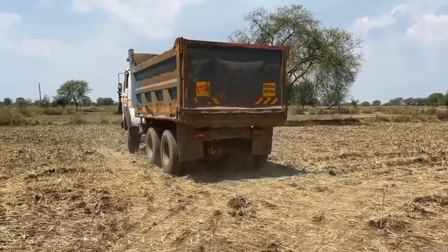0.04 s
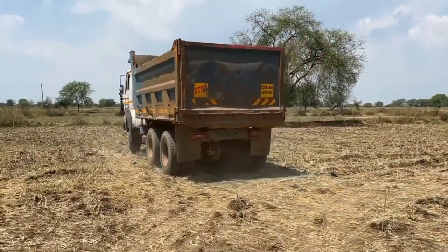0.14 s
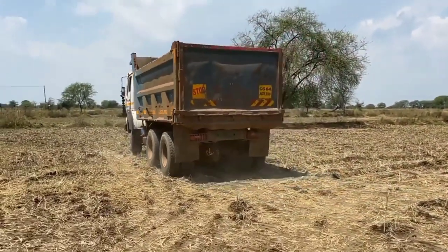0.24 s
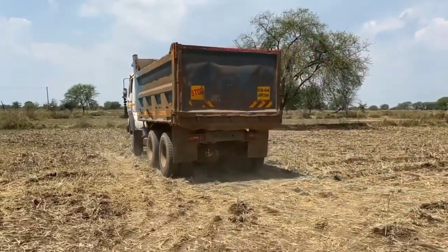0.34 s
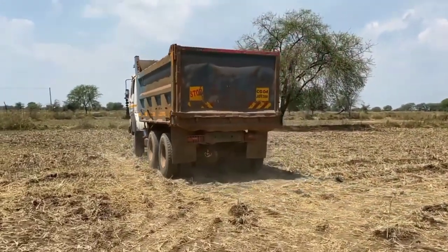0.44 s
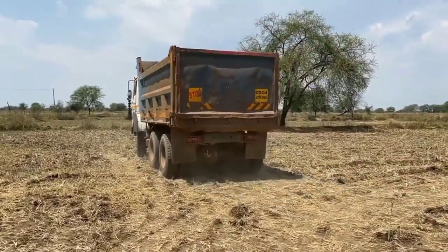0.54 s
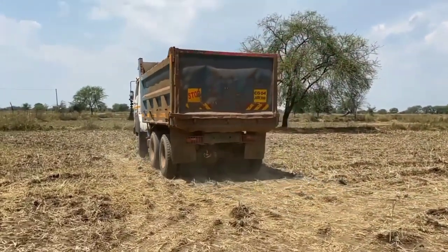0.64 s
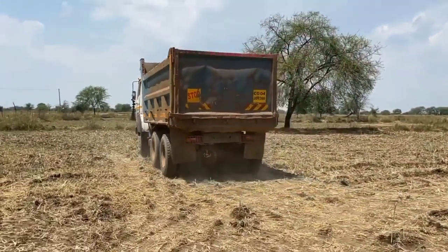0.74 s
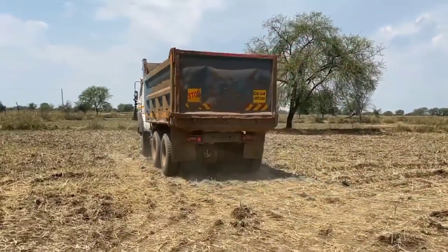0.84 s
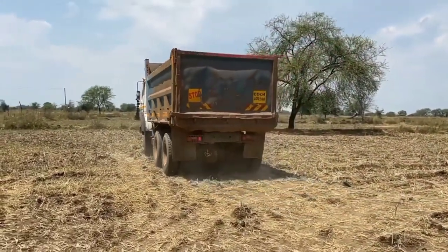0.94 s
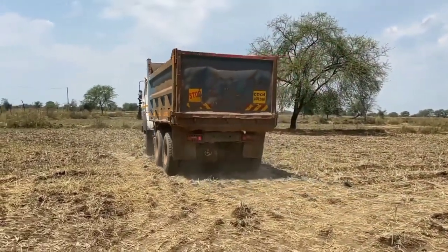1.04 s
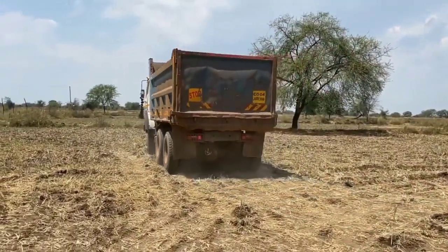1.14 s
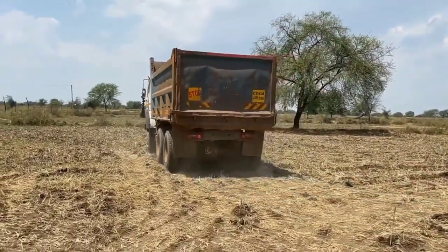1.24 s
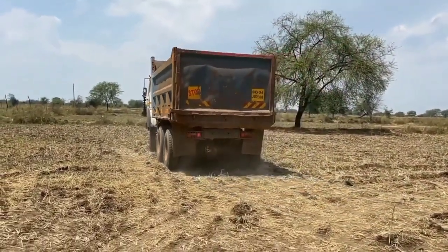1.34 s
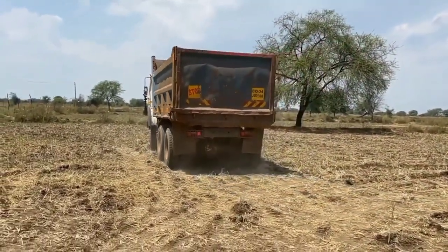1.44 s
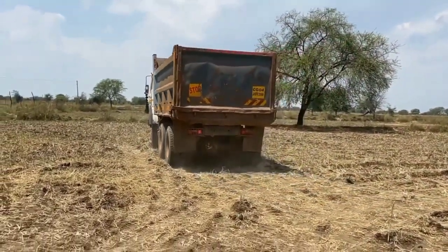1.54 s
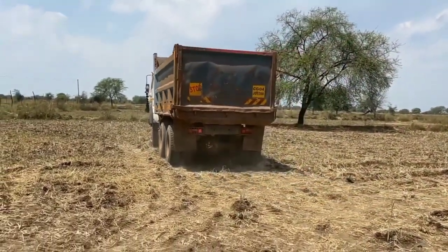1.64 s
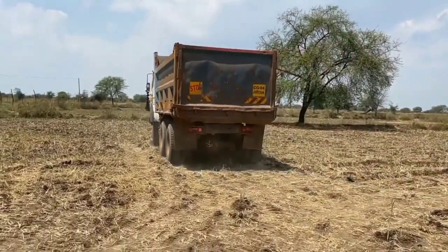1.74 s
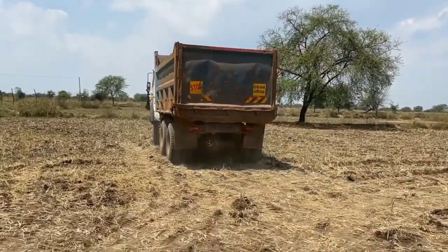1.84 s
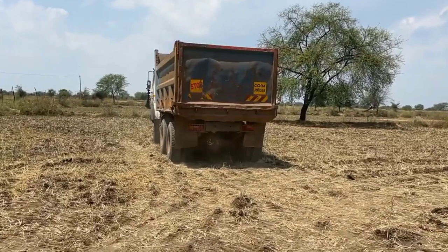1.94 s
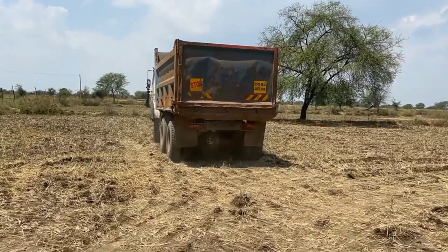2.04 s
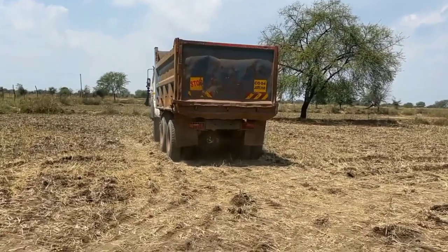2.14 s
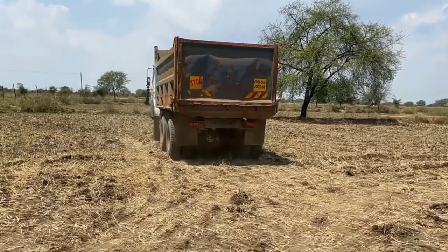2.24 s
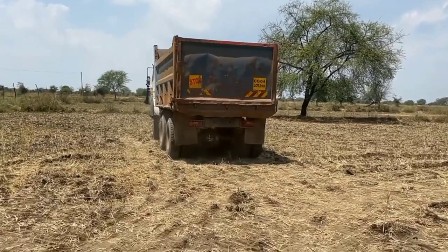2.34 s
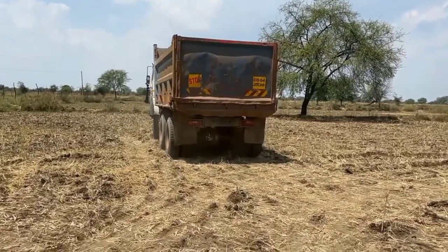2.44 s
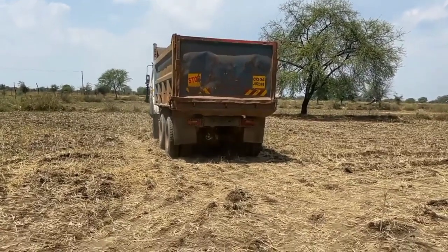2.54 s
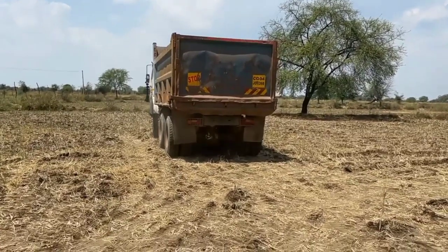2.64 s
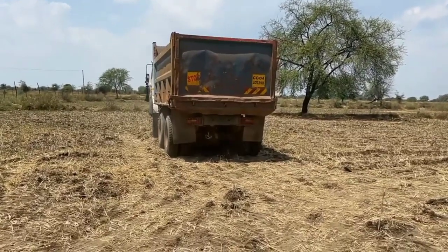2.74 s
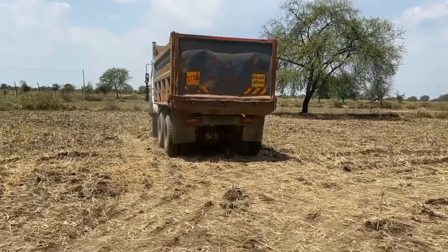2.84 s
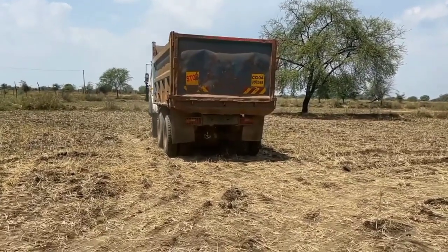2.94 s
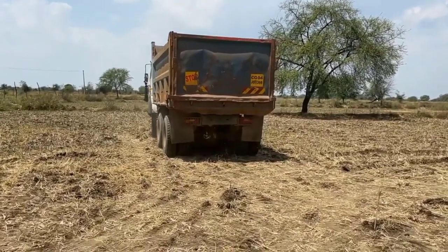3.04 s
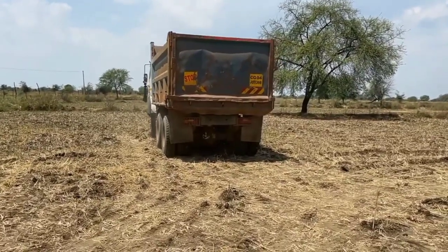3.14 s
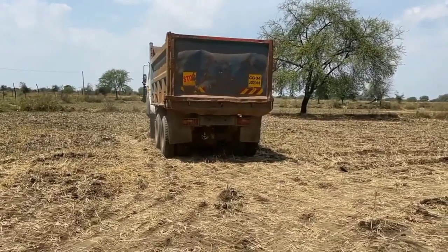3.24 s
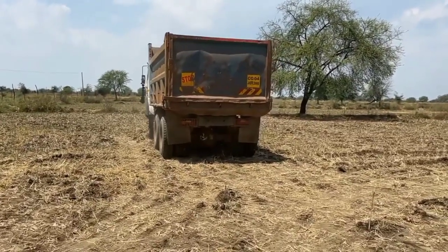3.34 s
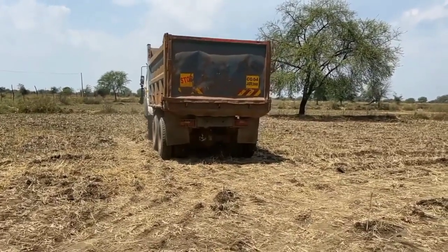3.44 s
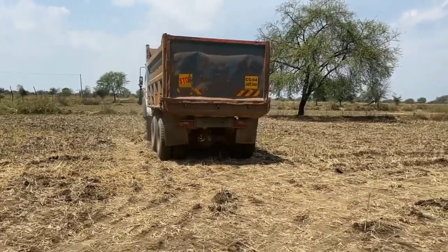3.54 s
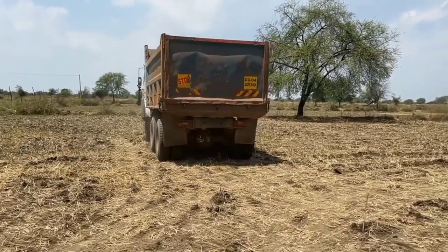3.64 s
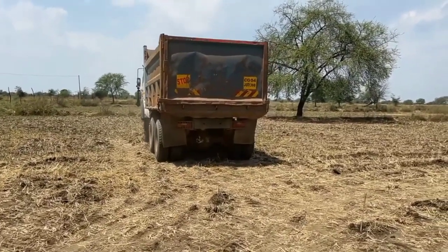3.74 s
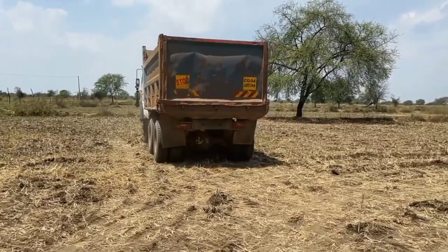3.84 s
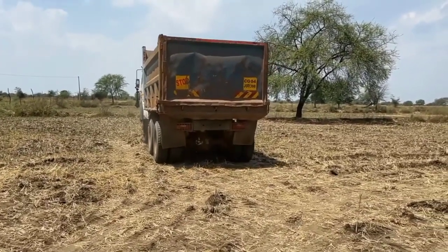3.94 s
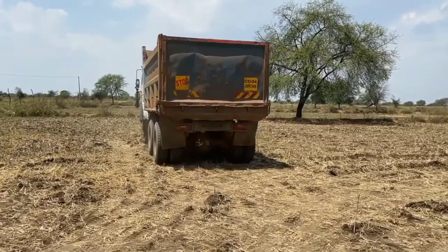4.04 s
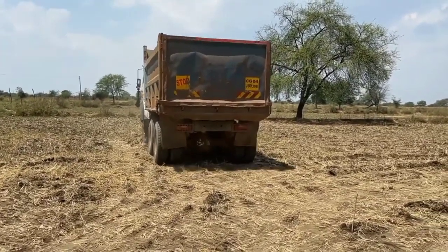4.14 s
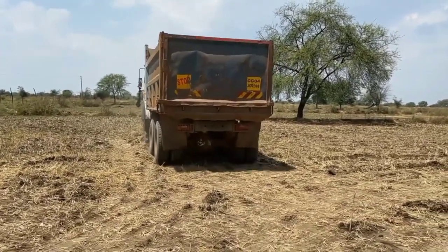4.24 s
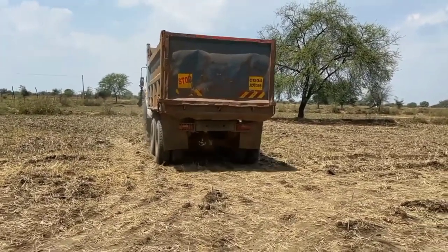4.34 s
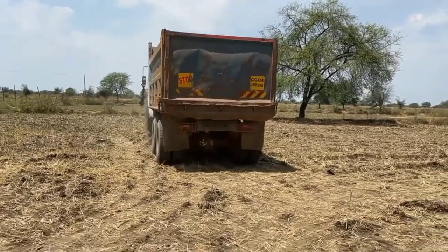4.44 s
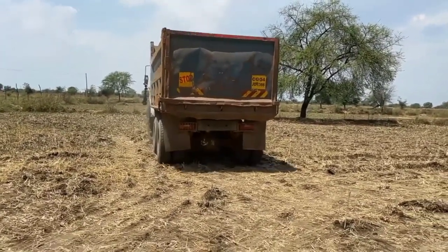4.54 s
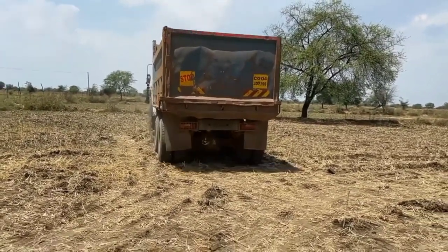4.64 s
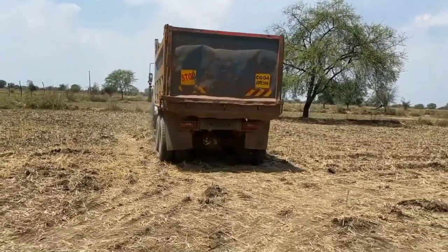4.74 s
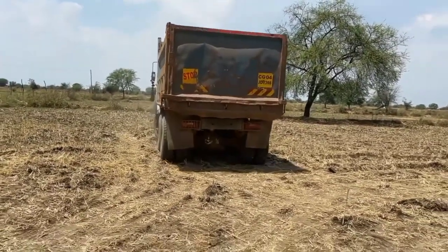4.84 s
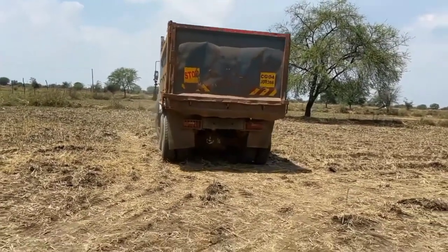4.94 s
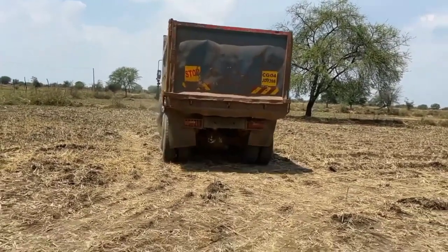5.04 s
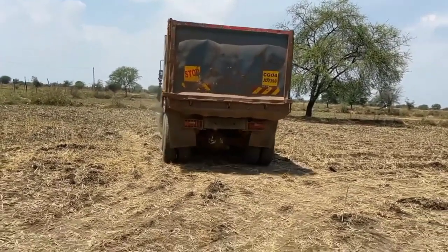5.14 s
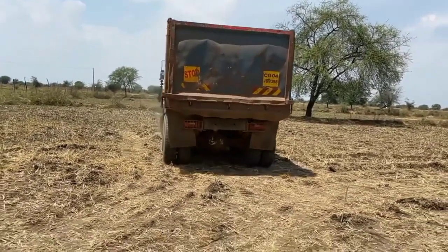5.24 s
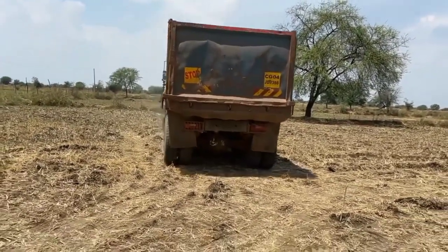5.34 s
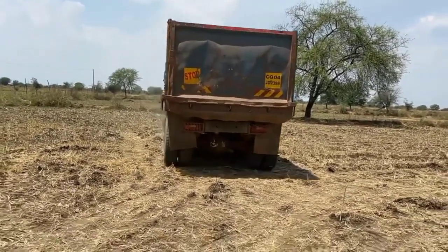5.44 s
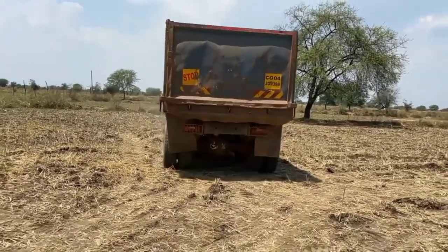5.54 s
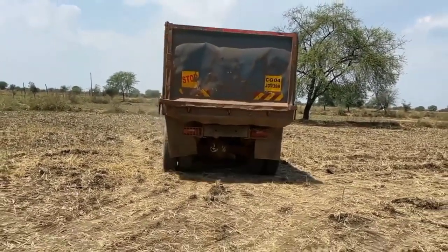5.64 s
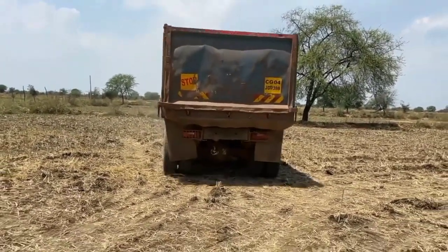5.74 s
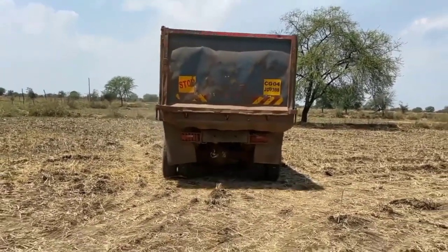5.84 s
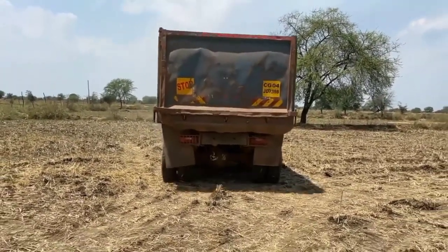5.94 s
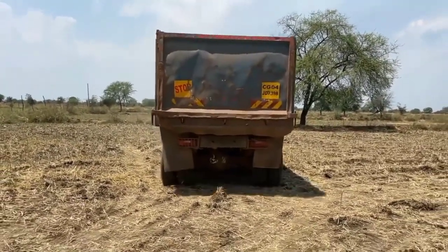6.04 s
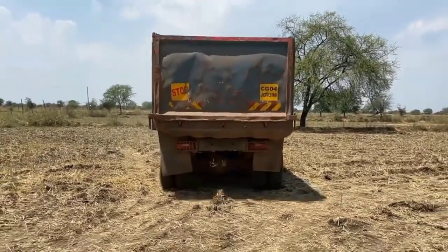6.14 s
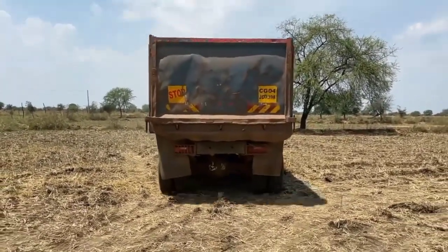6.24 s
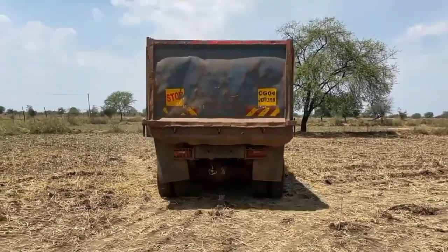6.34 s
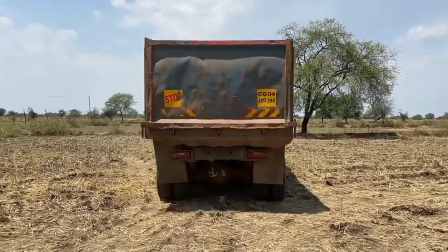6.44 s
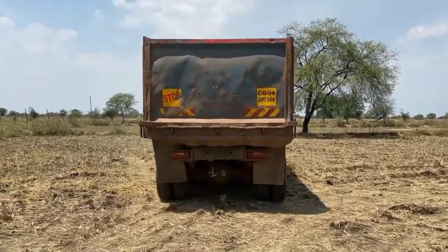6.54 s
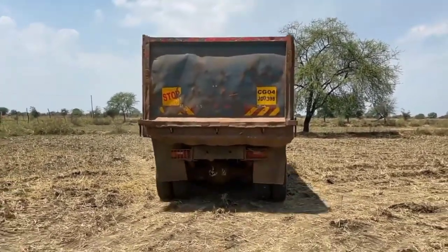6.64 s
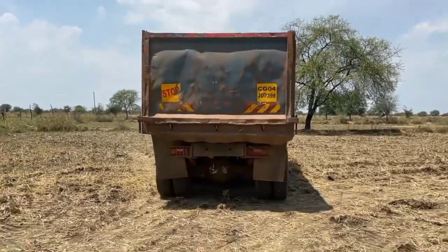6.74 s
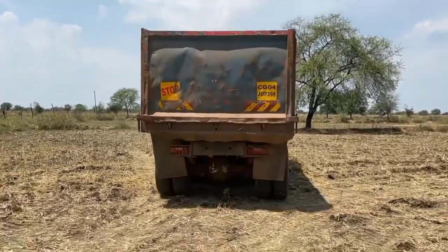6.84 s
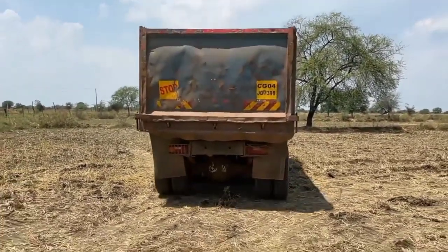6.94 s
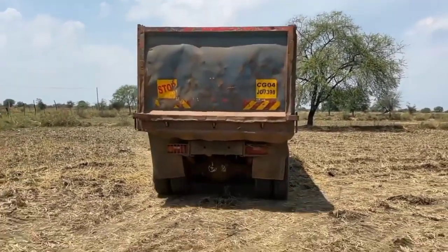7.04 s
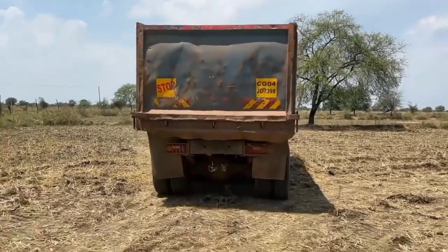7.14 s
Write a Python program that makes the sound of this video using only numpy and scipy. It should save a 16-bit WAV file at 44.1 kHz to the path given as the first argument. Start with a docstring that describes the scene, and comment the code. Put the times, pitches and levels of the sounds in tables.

```python
"""A loaded diesel tipper crawls over a dry stubble field: it eases off to idle, vents air, then pulls again.
Its exhaust booms as multiples of the firing rate sweep through pipe resonances, over coloured puffs of noise.
The steel body knocks (decaying bursts and tones) and squeaks (gliding harmonics); straw rustles and snaps.
A second diesel idles steadily out of sight: its pulsed noise ticks and its steady tones whine faintly."""
import sys
import numpy as np
from scipy import signal
from scipy.fft import rfft, irfft, next_fast_len
from scipy.io import wavfile

SR = 44100
rng = np.random.default_rng(int(sys.argv[2]) if len(sys.argv) > 2 else 0)


def unload_audio(sound):
    """Save the sound as a 16-bit wav file, at the path given as the first command line argument."""
    columns = np.transpose(np.atleast_2d(sound))
    # keep every value between -1 and 1, then stretch to whole-number steps
    steps = np.round(np.clip(columns, -1, 1) * 32767)
    wavfile.write(sys.argv[1], SR, steps.astype(np.int16))


N = 316638
T = np.arange(N) / SR


def amp(db):
    """Decibels express an amplitude ratio on a logarithmic scale."""
    return 10 ** (np.asarray(db) / 20)


def unit(x):
    """Dividing by the root mean square gives a signal unit effective amplitude."""
    return x / np.sqrt(np.mean(x ** 2) + 1e-20)


def curves(rows):
    """Linear interpolation joins each column of a table against time, its first column."""
    s, *columns = np.transpose(rows)
    return [np.interp(T, s, column) for column in columns]


def add(mix, start_s, sound):
    """Superposition: sounds that overlap simply sum."""
    part = mix[max(round(start_s * SR), 0):][:len(sound)]
    part += sound[:len(part)]


def colour(x, points):
    """Linear filtering multiplies a spectrum by a gain curve over log frequency; the result has rms 1."""
    hz, db = np.transpose(points)
    size = next_fast_len(N + 4096)
    log_hz = np.log(np.fft.rfftfreq(size, 1 / SR) + 1)
    gain = amp(np.interp(log_hz, np.log(hz), db, left=-70, right=-70))
    return unit(irfft(rfft(x, size) * gain, size)[:N])


def wander(hz):
    """Low-passed noise is a smooth random fluctuation, mostly slower than hz, with rms 1."""
    size, rate_hz = 8192, 1000
    f = np.fft.rfftfreq(size, 1 / rate_hz)
    slow = irfft(rfft(rng.standard_normal(size)) / np.sqrt(1 + (f / hz) ** 4))
    return unit(np.interp(T * rate_hz, np.arange(len(slow)), slow))


def burst(decay_s, hz, octaves, rise_s):
    """Impact: a band of noise round one pitch rises quickly and decays exponentially."""
    t = T[:SR // 2]
    f = np.fft.rfftfreq(len(t), 1 / SR) + 1
    band = np.exp(-0.5 * (np.log2(f / hz) / octaves) ** 2)
    noise = unit(irfft(rfft(rng.standard_normal(len(t))) * band, len(t)))
    return noise * (1 - np.exp(-t / rise_s)) * np.exp(-t / decay_s)


def fuzzy(hz, width_hz):
    """Narrow-band noise: random quadrature amplitudes spread a carrier, which may move, into a resonance."""
    phase = 2 * np.pi * np.cumsum(hz * np.ones(N)) / SR
    return wander(width_hz / 2) * np.cos(phase) + wander(width_hz / 2) * np.sin(phase)


def puffs(turns, length, bed, uneven_db):
    """Amplitude modulation: each firing sets off a decaying puff of its own strength over a steady noise bed."""
    # length is a share of the firing period; strengths run from -2 * uneven_db to 0 dB
    strength = amp(uneven_db * (2 * rng.random(1024) - 2.0))[turns.astype(int)]
    return (bed + strength * np.exp(-(turns % 1) / length)) * rng.standard_normal(N)


def truck():
    """Periodic combustion: one firing phase times the exhaust, rumble and block; straw rustles alongside."""
    # the truck's engine: start_s, firing_hz, effort_db
    engine = [(0, 62.56, -6), (.36, 57.8, -2), (.9, 58.78, -2.5), (1.05, 53.93, -2), (1.25, 51.12, -6),
              (1.62, 44.22, -0.5), (1.98, 37.79, -2.5), (2.4, 36.57, -1), (2.72, 34.42, -8.5),
              (3.1, 32.51, -3), (3.3, 31.2, -1), (3.5, 31.22, -4.5), (3.67, 35.41, 0.5),
              (3.95, 45.96, -0.5), (4.12, 49.9, -1.5), (4.58, 48.11, 0.5), (4.88, 52.96, -1.5),
              (5.06, 49.85, 2), (5.36, 56.04, -2.5), (5.55, 55.84, 0.5), (5.88, 59.18, 1), (6.65, 63.08, 1),
              (6.95, 60.6, 0), (7.18, 58.5, -6)]
    # level of rumble and clatter above what the speed gives: start_s, level_db
    noise_level = [(0, 1.7), (.85, 0.5), (1.4, -1), (2.5, -2.5), (3.2, 2), (3.62, 3.5), (4.0, -0.5),
                   (4.6, 1), (5.25, -0.6), (5.85, 0), (6.3, 0.5), (7.18, 1)]
    working_hz = 60  # firing rate at which the speed-dependent levels are stated
    firing_hz, effort_db = curves(engine)
    noise_db, = curves(noise_level)
    turns = np.cumsum(firing_hz) / SR  # firings so far
    octaves = np.log2(firing_hz / working_hz)
    return (exhaust(firing_hz, effort_db, turns) + barks(turns, octaves, effort_db)
            + rumble(turns, octaves, effort_db, noise_db) + clatter(turns, octaves, noise_db) + rustle())


def exhaust(firing_hz, effort_db, turns):
    """Source and filter: firing harmonics sweep through pipe resonances and dip as the fuel is eased."""
    # successive multiples of the firing rate: level_db, fuel_share (part that depends on the fuel)
    orders = [(-0.5, 1), (-7.5, 1), (-9.5, 0.34), (-12, 0.37), (-16, 0.33), (-13.5, 0.3)]
    # response of the exhaust pipe to a tone: frequency_hz, gain_db
    pipe = [(31, -55), (37, -48), (40, -33.5), (46, -24.5), (55, -20.5), (62, -18.5), (88, -22.5),
            (100, -36.5), (112, -44.5), (130, -27), (150, -26.5), (167, -26), (176, -34.5), (205, -40.5),
            (225, -42.5), (245, -35.5), (268, -37.5), (288, -32), (320, -44), (350, -41), (400, -52)]
    silencer_hz, silencer_width_hz = 151, 30  # tones above this resonance come out inverted
    pipe_hz, pipe_db = np.transpose(pipe)
    eased, out = easing(), np.zeros(N)
    for k, (db, fuel_share) in enumerate(orders, 1):
        tone_hz = k * firing_hz
        gain_db = np.interp(np.log(tone_hz), np.log(pipe_hz), pipe_db)
        level = amp(db + effort_db + gain_db) * (1 - fuel_share * eased)
        unsteady = 1 + np.sqrt(k) * (0.06 * wander(27) + 0.071 * wander(13.0))
        lag = np.pi / 2 + np.arctan(2 * (tone_hz - silencer_hz) / silencer_width_hz)
        out += level * unsteady * np.sqrt(2) * np.cos(2 * np.pi * k * turns - lag)
    return out


def easing():
    """Throttling: how far the fuel is eased at each moment, with linear ramps down and up."""
    # easings of the fuel: start_s, end_s, depth (above 1 the wheels drive the engine)
    easings = [(1.021, 1.897, 1.42), (2.034, 2.046, 0.93), (2.83, 2.958, 0.85), (3.192, 3.251, 0.75),
               (3.391, 3.434, 0.9), (3.646, 3.707, 1.14), (4.941, 5.126, 0.92)]
    ramp_s = 0.078  # each ramp is centred on the start or end time
    return sum(depth * np.clip(np.minimum(T - start, end - T) / ramp_s + 0.5, 0, 1)
               for start, end, depth in easings)


def barks(turns, octaves, effort_db):
    """Impulse response: each firing excites one sharp, quickly damped exhaust knock of its own strength."""
    level_db, growth_db_per_octave = -42, 27.5
    knock_hz, decay_s = 221, 0.0022
    fired = np.diff(np.floor(turns), prepend=0) > 0
    strength = np.minimum(rng.exponential(1, 1024), 3)[turns.astype(int)]
    t = T[:SR // 20]
    knock = np.sin(2 * np.pi * knock_hz * t) * np.exp(-t / decay_s)
    train = signal.oaconvolve(fired * strength, knock)[:N]
    band = signal.butter(3, [130, 400], "bandpass", fs=SR, output="sos")
    return amp(level_db + effort_db + growth_db_per_octave * octaves) * unit(signal.sosfilt(band, train))


def rumble(turns, octaves, effort_db, noise_db):
    """Subharmonics and pulsed flow: lines from unequal cylinders throb beside puffs of coloured gas noise."""
    # lines from unequal cylinders: multiple of the six-cylinder cycle, level_db (re the throb)
    cycle_lines = [(9, -8.5), (10, -6), (14, -8.5), (16, -5), (20, -12), (22, -15.5), (26, -14), (28, -15),
                   (32, -16)]
    # spectrum of the gas noise: frequency_hz, density_db (per Hz)
    gas_colour = [(25, -31), (45, -7), (75, 6), (110, 0.5), (170, -2.5), (210, -9), (270, -15),
                  (345, -14.5), (410, -22.5), (600, -28.5), (1200, -52)]
    throb_db, gas_db, growth_db_per_octave = -36, -32.5, 7.5
    eased_db = -2  # the gas rumbles less without fuel
    cycle = turns / 6  # one firing for each of six cylinders
    throb = np.zeros(N)
    for k, db in cycle_lines:
        turn = k * cycle + rng.random() + 0.11 * wander(5.2)
        throb += amp(db) * np.sqrt(2) * (1 + 0.34 * wander(8.2)) * np.cos(2 * np.pi * turn)
    gas = colour(puffs(turns, length=0.44, bed=0.38, uneven_db=11.0), gas_colour)
    level = amp(growth_db_per_octave * octaves + noise_db + eased_db * easing())
    return level * (amp(throb_db + effort_db) * throb + amp(gas_db) * gas)


def clatter(turns, octaves, noise_db):
    """Structure-borne sound: firings shake block and body, whose noise grows steeply with engine speed."""
    # spectrum of the block noise: frequency_hz, density_db (per Hz)
    block_colour = [(200, -23), (420, 4), (650, 8), (900, 1.5), (1150, -0.5), (1500, -6), (1900, -19),
                    (2500, -15), (3200, -13), (4600, -20.5), (5800, -28.5), (7000, -42), (9000, -64)]
    block_db, growth_db_per_octave = -45.5, 14
    block = colour(puffs(turns, length=0.35, bed=0.87, uneven_db=11.0), block_colour)
    return amp(block_db + growth_db_per_octave * octaves + noise_db) * (block + amp(-5.5) * rattle(rate_per_s=30))


def rattle(rate_per_s):
    """Random impulse trains excite damped resonances: loose fittings chatter in uneven taps, at rms 1."""
    # loose fittings of the tipper body: centre_hz, relative tap level_db
    fittings = [(420, -1), (700, -14), (1150, -2.5), (1800, -7), (2700, -9.5)]
    out = np.zeros(N)
    for hz, db in fittings:
        taps = (rng.random(N) < rate_per_s / SR) * rng.uniform(0.34, 1, N)
        tap = burst(decay_s=0.015, hz=hz, octaves=0.35, rise_s=0.00023)[:SR // 10]
        out += amp(db) * signal.oaconvolve(taps, tap)[:N]
    return unit(out)


def rustle():
    """Granular noise: random spikes over a fluctuating hiss are the straw crushed under the tyres."""
    # spectrum of the straw: frequency_hz, density_db (per Hz)
    straw_colour = [(2000, -17.5), (4500, 10), (7000, 6.5), (8600, -2.5), (10000, 3), (12000, -2),
                    (13500, -10), (14500, -25)]
    # level of the straw: start_s, level_db
    straw_level = [(0, -61.5), (0.9, -62.5), (1.5, -67), (2.4, -70.5), (3.0, -73), (3.95, -69.5),
                   (4.45, -63), (5.1, -69), (5.7, -61), (6.1, -63), (7.18, -62.5)]
    spikes = rng.random(N) < 250 / SR  # about 250 per second
    crunch = rng.standard_normal(N) * (1 + 6 * spikes) * amp(1.4 * wander(25))
    return amp(curves(straw_level)[0]) * colour(crunch, straw_colour)


def singing():
    """Structural resonance: narrow bands of noise swell and fade, drifting a little in pitch."""
    # resonances of the truck's body and pipes: start_s, end_s, pitch_hz, width_hz, level_db
    resonances = [(-0.15, 0.85, 358, 32, -43.5), (-0.3, 0.3, 385, 40, -42), (0.33, 0.76, 177, 10, -39),
                  (1.1, 2.0, 272, 25, -49), (-0.5, 1.09, 1150, 240, -48.5), (-0.5, 1.06, 2370, 250, -54.5),
                  (-0.8, 0.89, 1950, 56, -60), (3.35, 4.0, 1170, 160, -52.5), (5, 6.25, 2985, 130, -61),
                  (5, 6.1, 3700, 200, -68.5), (5.2, 6.3, 985, 140, -56), (5.8, 7.4, 634, 34, -48),
                  (5.8, 7.4, 755, 45, -53.5), (6.05, 7.4, 342, 30, -44.5)]
    drift, flutter_db = 0.008, 1.5  # rms share of the pitch, rms level change
    out = np.zeros(N)
    for start, end, hz, width_hz, db in resonances:
        swell = np.clip(np.minimum(T - start, end - T) / 0.23, 0, 1)
        level = amp(db + flutter_db * wander(9)) * swell
        out += level * fuzzy(hz * (1 + drift * wander(5.06)), width_hz)
    return out


def gear_whine():
    """Periodic meshing gives thin tones: those of gears and pumps come and go, wavering in level and pitch."""
    # whines of gears and pumps: start_s, end_s, pitch_hz, level_db
    whines = [(-0.3, 4.3, 2891, -71.5), (-0.3, 3.1, 2917, -74.5), (0.8, 2.286, 2926, -71.5),
              (4.05, 5.25, 2280, -61.5), (5.0, 7.5, 2241, -66), (5.0, 6.3, 3008, -69)]
    fade_s, waver_hz = 0.16, 4.6
    out = np.zeros(N)
    for start, end, hz, db in whines:
        fade = np.clip(np.minimum(T - start, end - T) / fade_s, 0, 1)
        swell = fade * np.maximum(1.0 + 0.62 * wander(19), 0)
        phase = 2 * np.pi * np.cumsum(hz + waver_hz * wander(19)) / SR
        out += amp(db) * swell * np.sqrt(2) * np.sin(phase)
    return out


def knocks():
    """Impulsive excitation: dry stalks snap, the tipper body jolts and the chassis thuds, each decaying."""
    # snapping stalks, levels before the cuts below: start_s, level_db, lower_hz, upper_db (re the lower)
    snaps = [(0.1346, -47, 6140, 3), (0.8153, -29.5, 5900, 0), (0.82, -30, 5600, -4),
             (0.833, -35, 6400, -9), (0.977, -44, 6560, 3), (0.982, -39, 6260, -3), (1.039, -31, 5000, 1.5),
             (1.044, -36, 6240, 12.5), (1.061, -30, 6000, -1.5), (1.0724, -36, 6670, -11),
             (2.2217, -44, 6300, 4), (2.703, -53, 8704, -20), (2.7983, -37, 8600, -20),
             (3.288, -52, 6500, -3), (5.2535, -55.5, 5900, 15), (5.5674, -42, 6980, -11),
             (5.78, -50, 6500, 6), (6.206, -38, 6223, 2), (6.2359, -53, 6310, 7)]
    # jolts of the steel body: start_s, level_db, decay_s, centre_hz, width_octaves
    jolts = [(2.831, -46, 0.029, 370, 0.33), (3.161, -38.5, 0.012, 340, 0.54),
             (3.868, -40.5, 0.018, 2300, 0.52), (3.874, -29.5, 0.033, 255.5, 0.4),
             (3.883, -44, 0.037, 1150, 0.5), (5.567, -43.5, 0.0099, 1870, 0.98),
             (6.19, -51, 0.047, 889, 0.59), (6.239, -38, 0.039, 466.2, 0.19),
             (6.34, -35.5, 0.058, 279, 0.32), (6.42, -48, 0.047, 2760, 0.36),
             (6.749, -48, 0.06, 2620, 0.31), (6.775, -31.5, 0.05, 263, 0.52)]
    # thuds of the chassis, each ringing at one pitch: start_s, level_db, decay_s, pitch_hz
    thuds = [(2.765, -42.5, 0.032, 523), (3.162, -14, 0.0022, 245), (3.876, -32, 0.024, 216),
             (3.882, -36, 0.034, 787.7), (3.887, -24, 0.0098, 315), (3.9098, -28, 0.0072, 277.7),
             (4.63, -20, 0.08, 91.6), (5.558, -35, 0.0034, 680), (6.675, -18, 0.034, 120.3),
             (7.04, -24, 0.06, 92)]
    snap_decay_s, upper_ratio = 0.0034, 1.82
    out, t = np.zeros(N), T[:SR // 2]
    for s, db, hz, upper_db in snaps:
        lower = burst(snap_decay_s, hz, octaves=0.3, rise_s=0.00056)
        upper = burst(snap_decay_s, hz * upper_ratio, octaves=0.21, rise_s=0.00033)
        add(out, s, amp(db - 7.0) * lower)
        add(out, s, amp(db - 10.5 + upper_db) * upper)
    for s, db, decay_s, hz, octaves in jolts:
        add(out, s, amp(db) * burst(decay_s, hz, octaves, rise_s=0.0023))
    for s, db, decay_s, hz in thuds:
        envelope = (1 - np.exp(-t * hz * 2)) * np.exp(-t / decay_s)
        add(out, s, amp(db) * np.sin(2 * np.pi * hz * t) * envelope)
    top_hz = 13200  # low-pass corner for all the knocks
    return signal.sosfilt(signal.butter(4, top_hz, fs=SR, output="sos"), out)


def squeak():
    """Stick-slip friction: a dry joint squeals, jumps to a higher pitch, stutters out and rings the body."""
    # squeals of the joint: start_s, length_s, pitch_hz (midway), level_db (fundamental), glide_hz_per_s
    squeals = [(1.749, 0.074, 1728, -39.5, 499), (1.811, .038, 1940, -34, 2200)]
    rise_s, fall_s = 0.018, 0.015
    stutter_db, stutter_per_s, stutter_decay_s = -41.5, 86, 0.042
    uneven, flutter_hz = 0.21, 35.2  # rms irregularity of timing (share of a slip) and pitch
    echo_db, echo_s = -11, 0.04
    out = np.zeros(N)
    for start, length, hz, db, glide in squeals:
        t = np.clip(T - start, 0, length)
        swell = np.clip(np.minimum(t / rise_s, (length - t) / fall_s), 0, 1)
        out += amp(db) * swell * squeal(hz + glide * (t - length / 2))
    start, length, hz, *_ = squeals[-1]
    after = np.maximum(T - start - length, 0)
    slips = np.sin(np.pi * (stutter_per_s * after + uneven * wander(30))) ** 2
    slips = (after > 0) * slips * np.exp(-after / stutter_decay_s)
    out += amp(stutter_db) * slips * squeal(hz + flutter_hz * wander(58))
    # the steel body rings on after the squeal
    ring = burst(echo_s, hz=3000, octaves=2, rise_s=0.004)
    return out + amp(echo_db) * signal.oaconvolve(out, ring / np.linalg.norm(ring))[:N]


def squeal(hz):
    """Harmonic series: a slipping joint sounds at whole multiples of one slightly unsteady pitch."""
    # successive harmonics: level_db (re the fundamental)
    partials_db = [0, -17, -31, -31, -38, -39]
    phase = 2 * np.pi * np.cumsum(hz * (1 + 0.0066 * wander(103))) / SR
    return np.sqrt(2) * sum(amp(db) * np.sin(k * phase) for k, db in enumerate(partials_db, 1))


def vents():
    """Turbulent jets: brake and clutch valves hiss; a whistle at the first sags as its pressure falls."""
    # air valves: start_s, end_s, level_db (at the peak)
    valves = [(2.946, 3.288, -53.5), (3.244, 3.633, -63.5)]
    # one spectrum for each valve: frequency_hz, density_db (per Hz)
    valve_colours = [
        [(2000, 8), (2700, -2), (3250, 3), (3900, -6), (4900, -3), (5800, -19), (6150, -8), (6500, 0),
         (7000, -11), (7600, -13), (8600, -3), (10000, -19), (12000, -38)],
        [(7000, -26), (9000, -10), (10000, -1), (11500, 0), (13300, -6), (14200, -30)],
    ]
    whistle_start_s, whistle_peak_s, whistle_db = 2.99, 0.11, -56.5  # peak time counts from the start
    final_hz, sag_hz = 2900, 512  # the pitch begins sag_hz above the pitch it approaches
    out = np.zeros(N)
    for (start, end, db), points in zip(valves, valve_colours):
        swell = np.sin(np.pi * np.clip((T - start) / (end - start), 0, 1)) ** 2
        out += amp(db) * swell * colour(rng.standard_normal(N), points)
    t = np.maximum(T - whistle_start_s, 0) / whistle_peak_s
    hz = final_hz + sag_hz * np.exp(-t / 2)
    return out + amp(whistle_db) * (t * np.exp(1 - t)) ** 2 * fuzzy(hz, width_hz=260)


def idler():
    """Cyclic modulation: the second diesel's strokes pulse its injector tick and block noise beside thin whines."""
    # four unequal injectors: level_db (relative)
    injectors_db = [3.7, 4.4, 5.6, 2.9]
    # spectra of the tick and of the block noise: frequency_hz, density_db (per Hz)
    tick_colour = [(600, -13), (1200, -13), (1800, 15.5), (2200, 3), (2800, -9), (3350, -21), (4100, 0.5),
                   (4580, 7.5), (4950, -1), (5900, -10.5), (6700, -2.5), (7400, -8), (8200, -28),
                   (13000, -30)]
    body_colour = [(36, -10), (52, 12.5), (75, -3.5), (105, -5), (150, 11.5), (175, 7), (210, 4), (280, 0),
                   (400, -7), (720, -0.5), (860, -7), (1150, -2), (1400, -6.5), (1800, -10.5), (2050, -11),
                   (2500, -12.5), (3300, -25.5), (3700, -17), (6000, -33), (9000, -39)]
    # steady whines: pitch_hz, first_db, last_db
    whines = [(808.7, -53, -55.5), (737, -59, -51), (970.5, -68, -64), (1651, -68, -68)]
    idle_hz = 28.33  # firing rate
    turns = idle_hz * T + 0.018 * wander(3.5)
    stroke = np.abs(np.cos(np.pi * turns)) ** 3
    injector_db = np.take(injectors_db, np.round(turns).astype(int), mode="wrap")
    injector = amp(injector_db + 3.9 * np.tanh(wander(20.0)))
    tick = amp(-57.5) * colour(injector * (0.7 + stroke) * rng.standard_normal(N), tick_colour)
    body = amp(-45.5) * colour((1 + 0.27 * stroke) * rng.standard_normal(N), body_colour)
    whine = np.zeros(N)
    for hz, first_db, last_db in whines:
        level = amp(np.linspace(first_db, last_db, N)) * (1 + 0.039 * wander(21.0))
        whine += level * np.sqrt(2) * np.sin(2 * np.pi * hz * (T + 0.0002 * wander(6.5)))
    return tick + body + whine


def scene():
    """Superposition of the truck, its body and valves, the snapping stalks and the second diesel."""
    return (truck() + singing() + gear_whine() + knocks() + squeak() + vents() + idler())[None]


def record(dry):
    """Band limiting: a symmetric low-pass filter removes the highest treble without shifting the sound."""
    cutoff_hz = 15400
    taps = signal.firwin(511, cutoff_hz, window=("kaiser", 9), fs=SR)
    padded = np.pad(dry[0], len(taps) // 2, "reflect", reflect_type="odd")
    return signal.oaconvolve(padded, taps, "valid")[None]


dry = scene()
out = record(dry)
unload_audio(out)
```